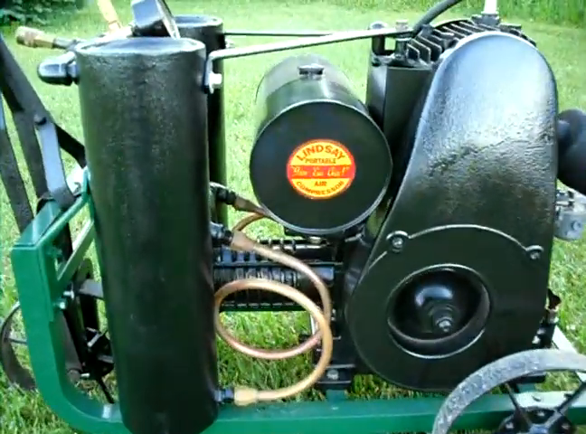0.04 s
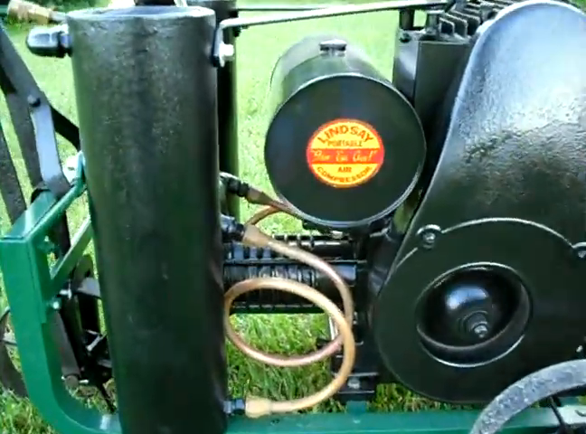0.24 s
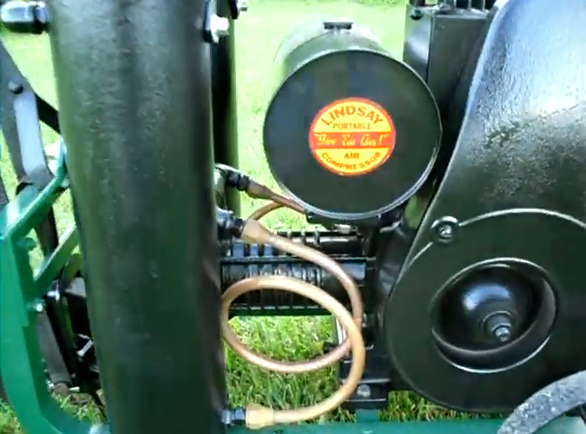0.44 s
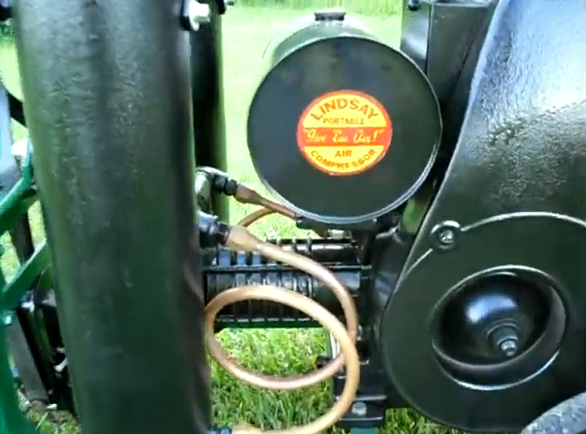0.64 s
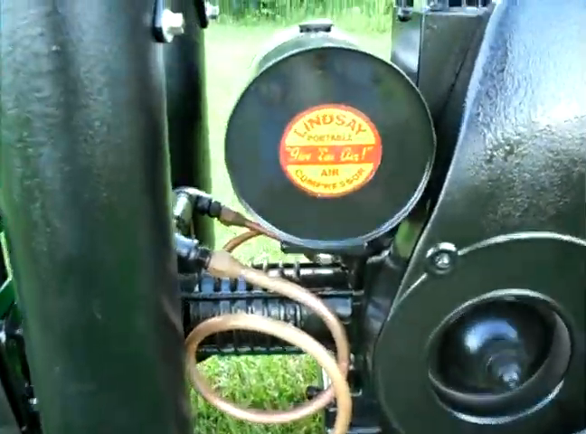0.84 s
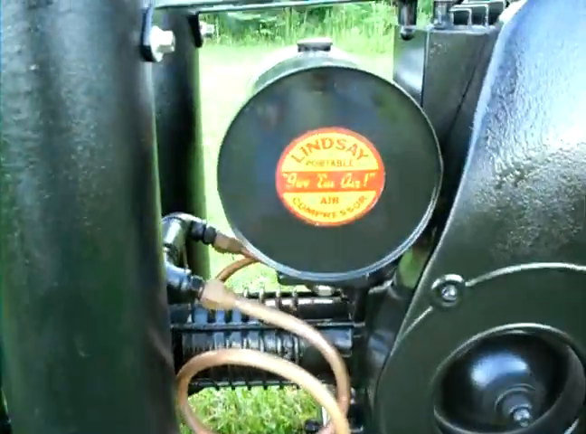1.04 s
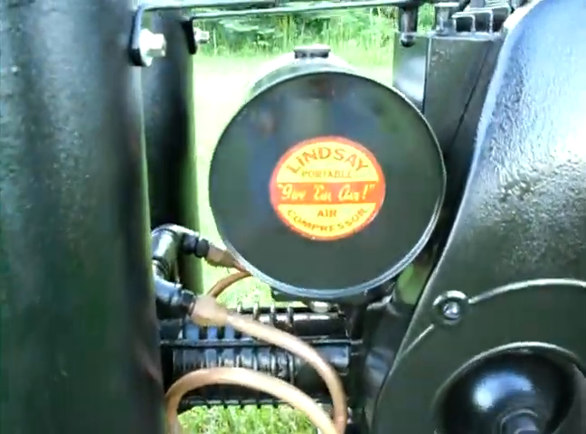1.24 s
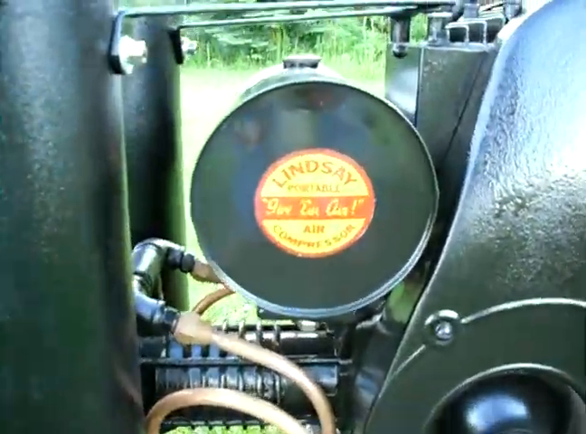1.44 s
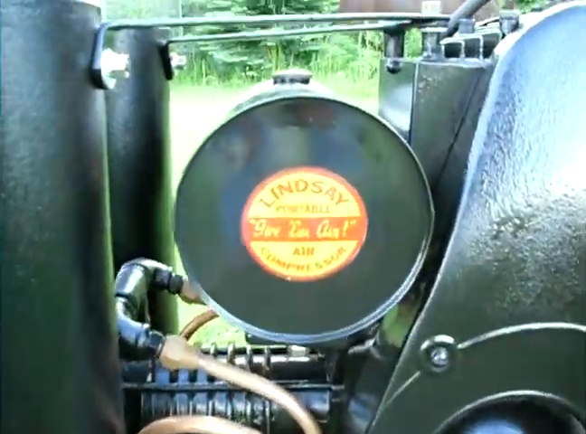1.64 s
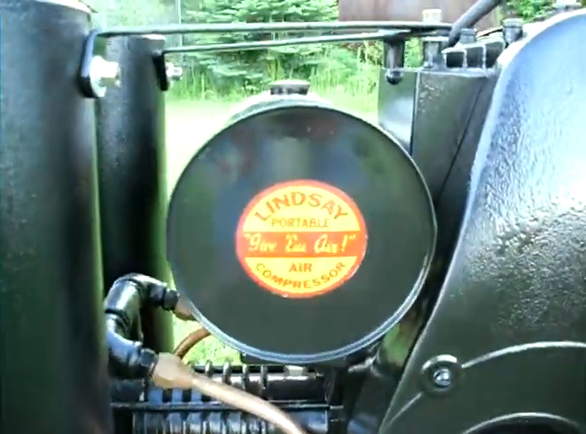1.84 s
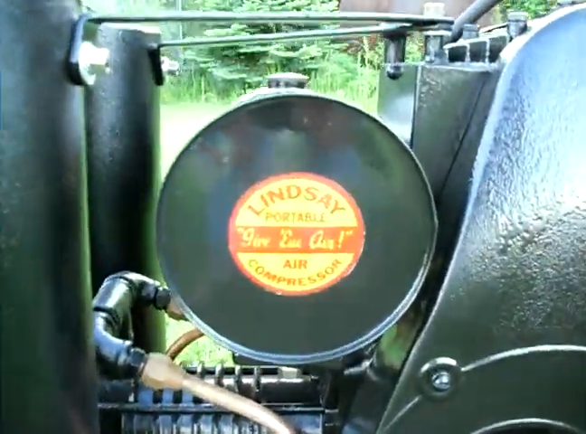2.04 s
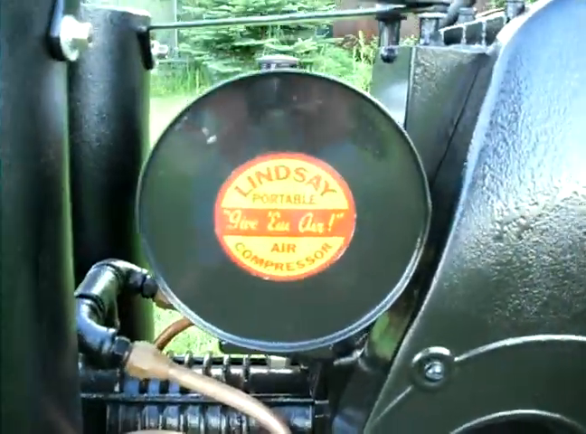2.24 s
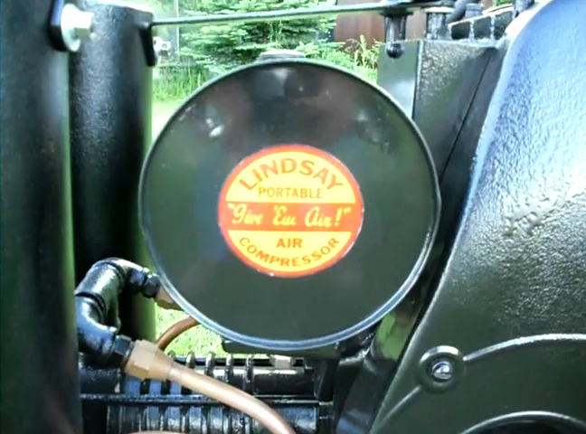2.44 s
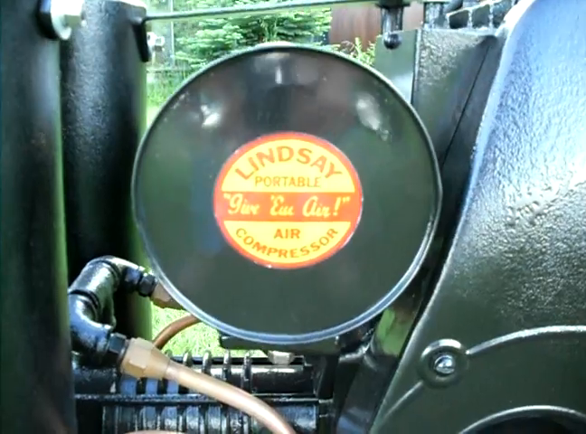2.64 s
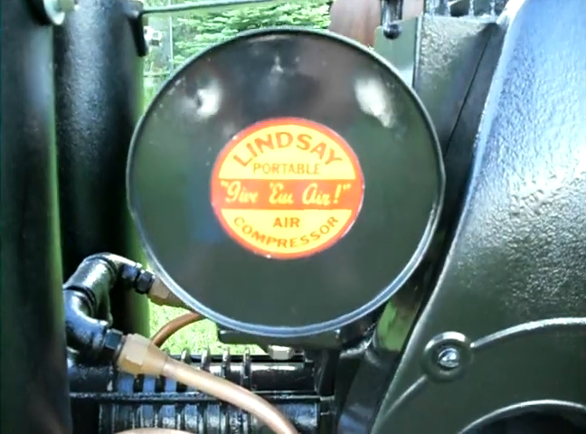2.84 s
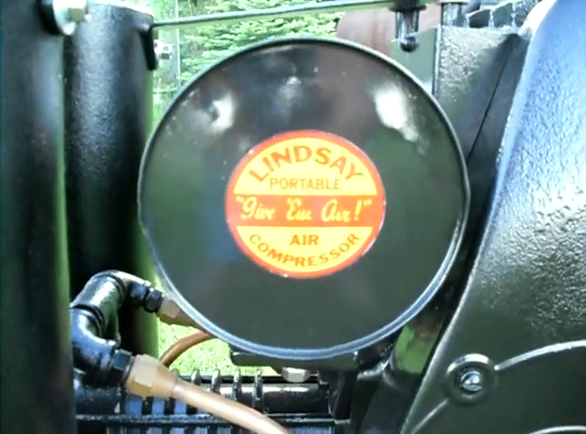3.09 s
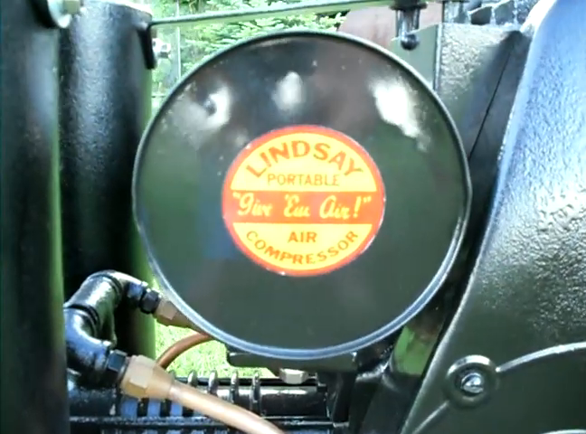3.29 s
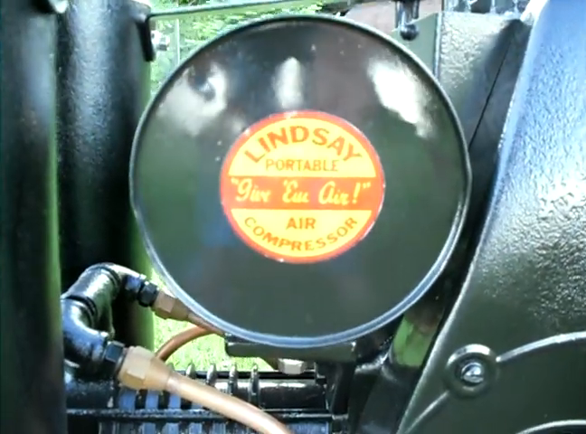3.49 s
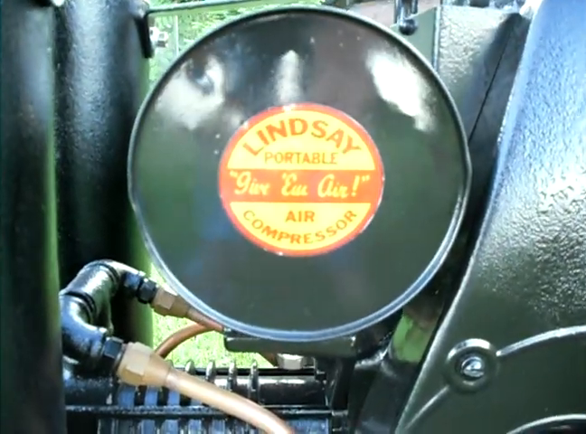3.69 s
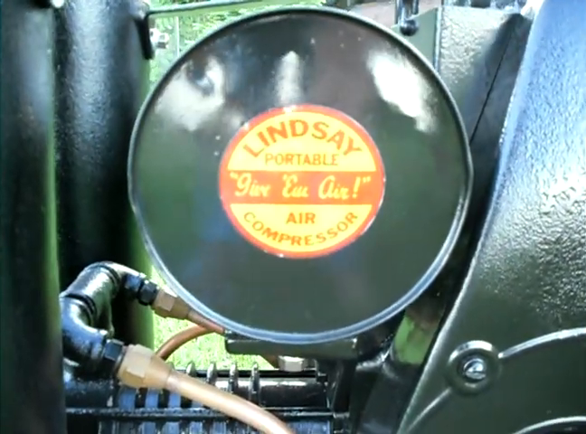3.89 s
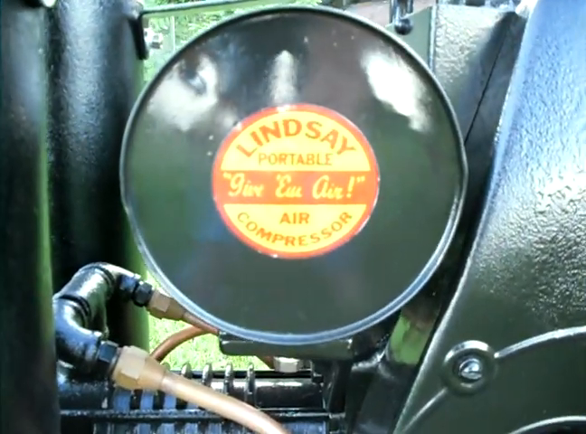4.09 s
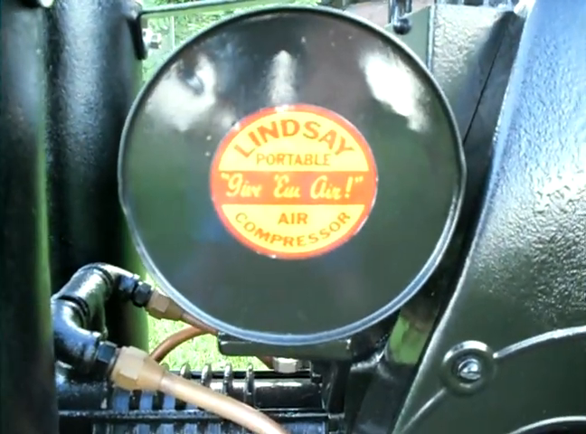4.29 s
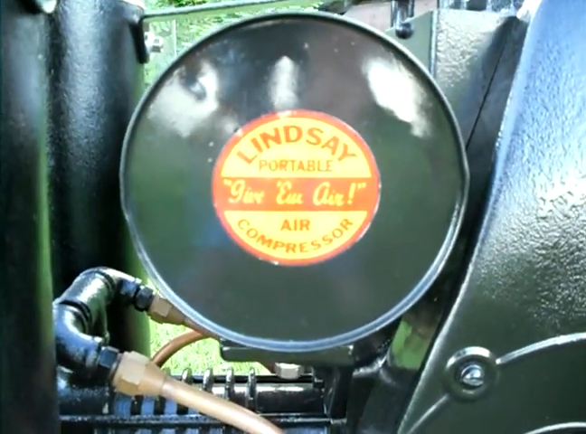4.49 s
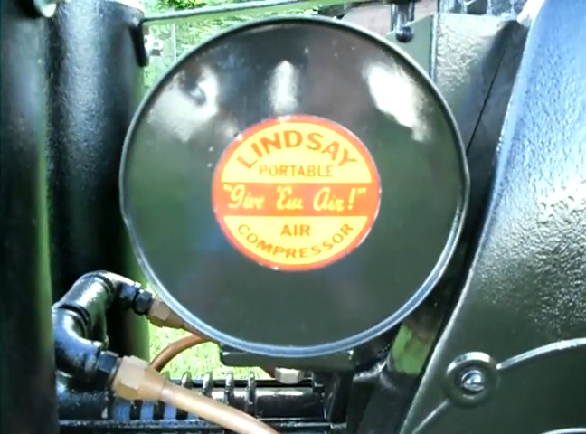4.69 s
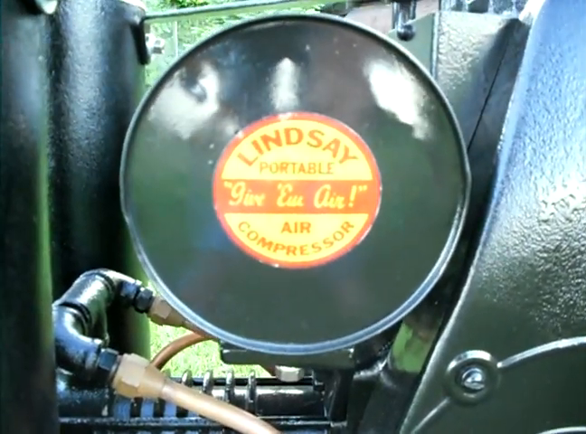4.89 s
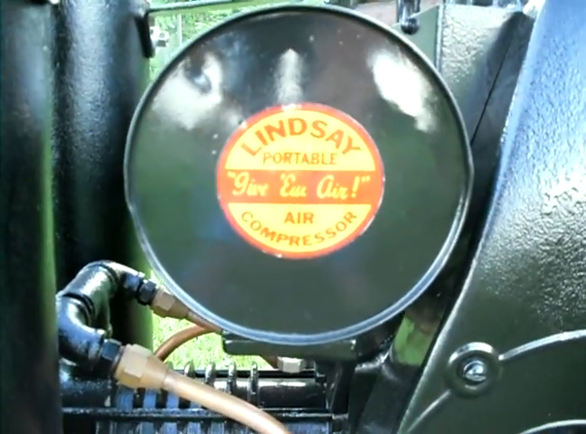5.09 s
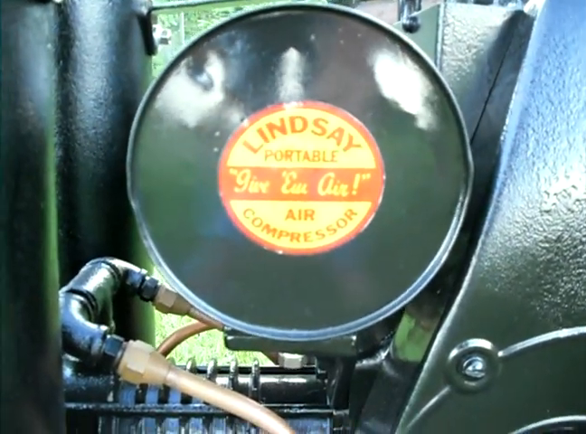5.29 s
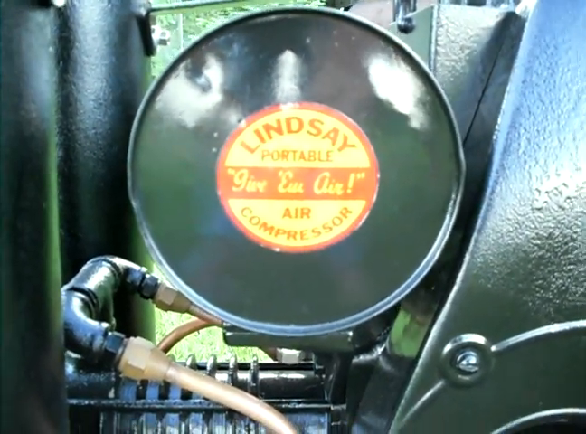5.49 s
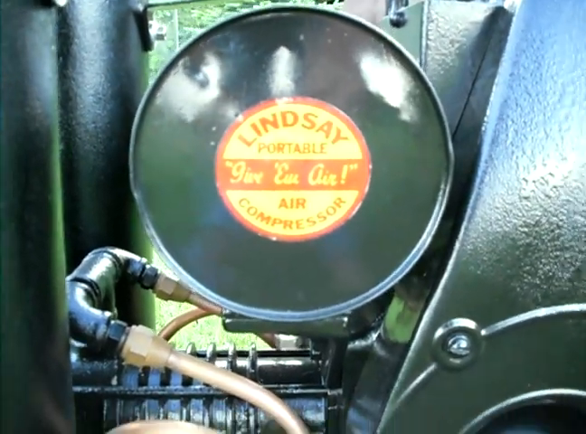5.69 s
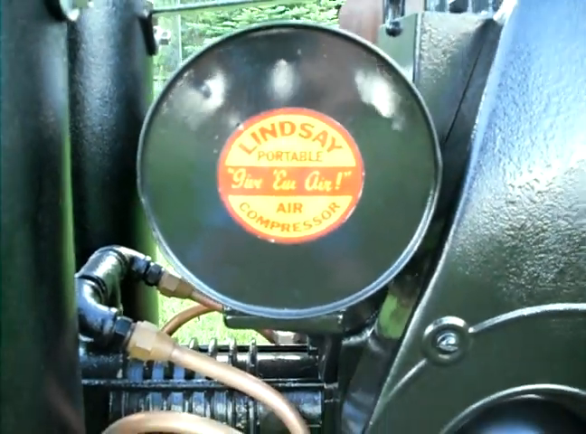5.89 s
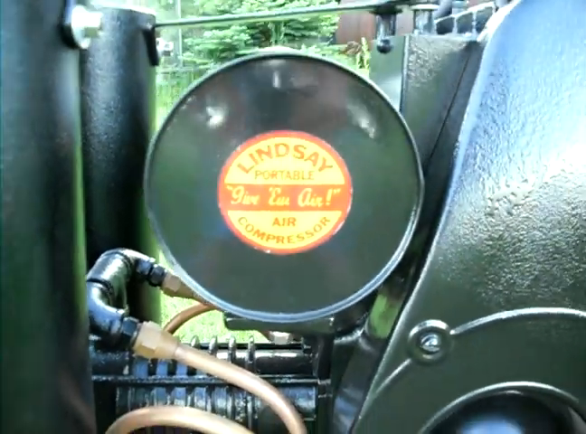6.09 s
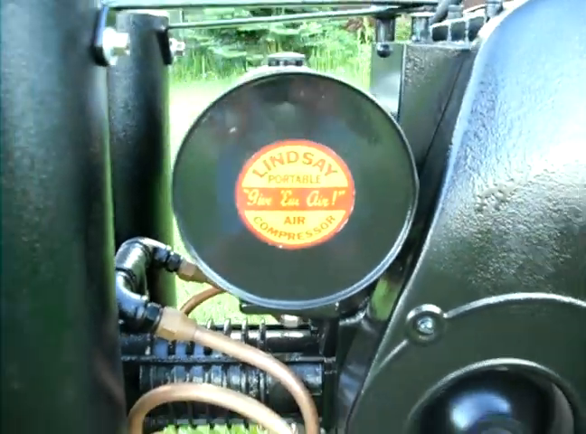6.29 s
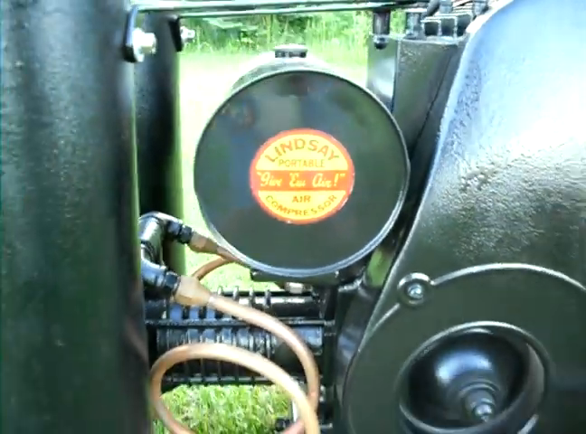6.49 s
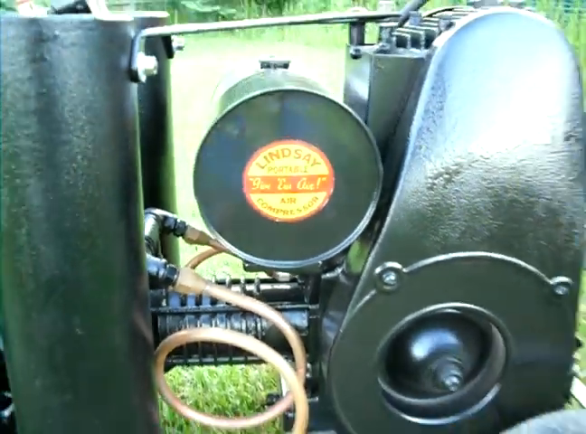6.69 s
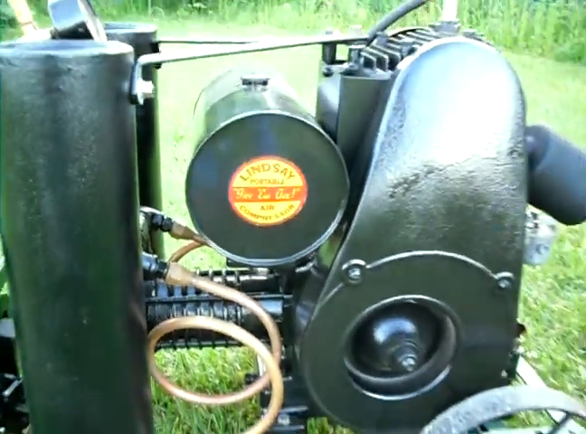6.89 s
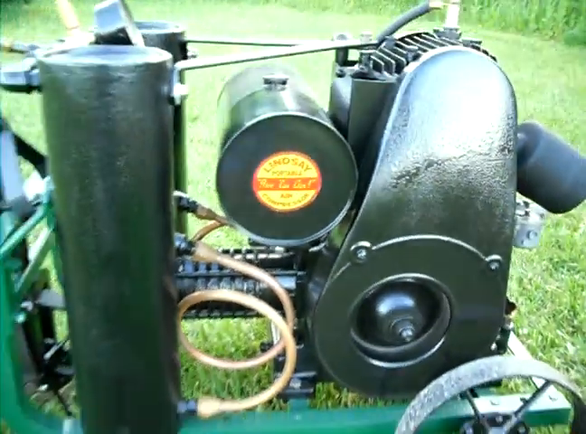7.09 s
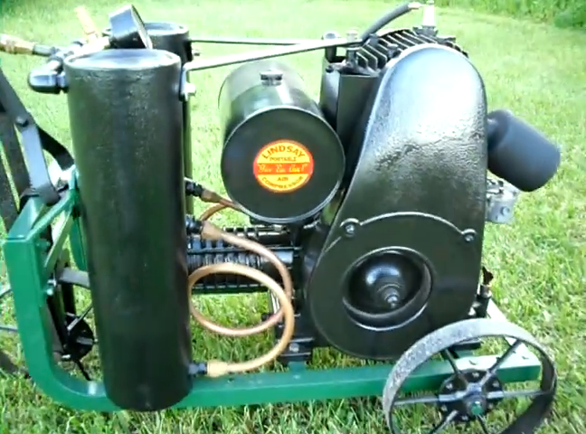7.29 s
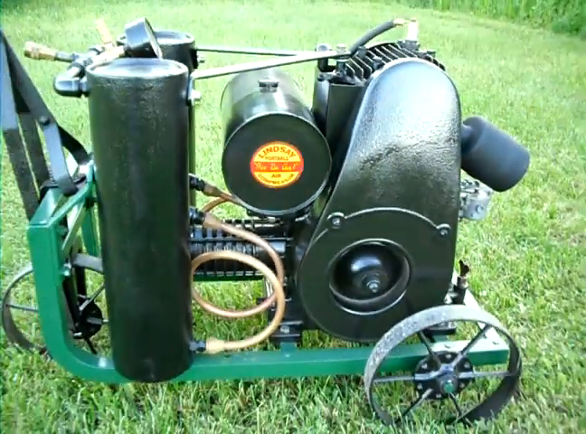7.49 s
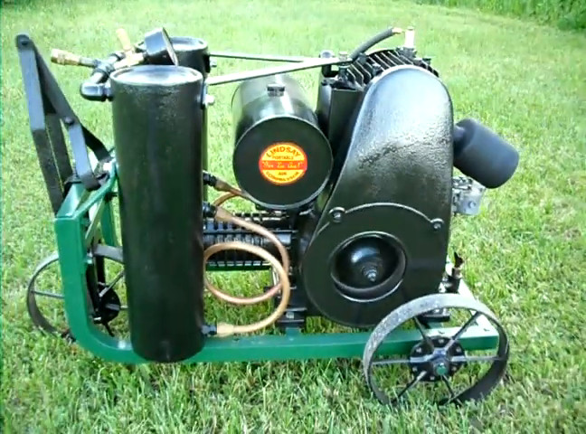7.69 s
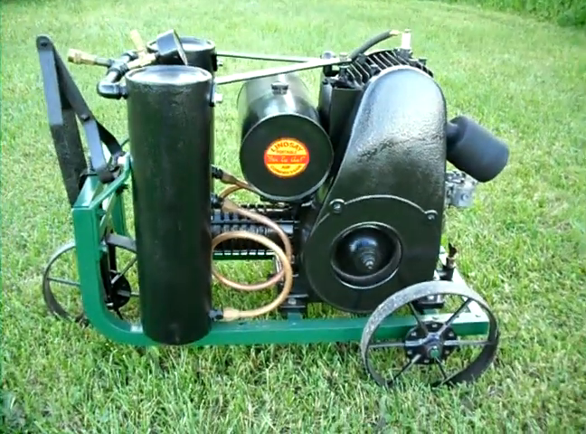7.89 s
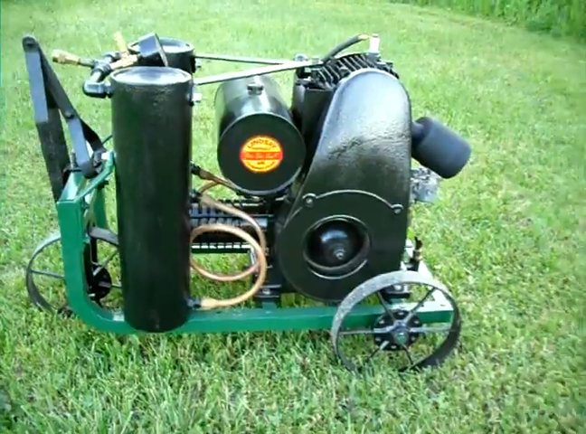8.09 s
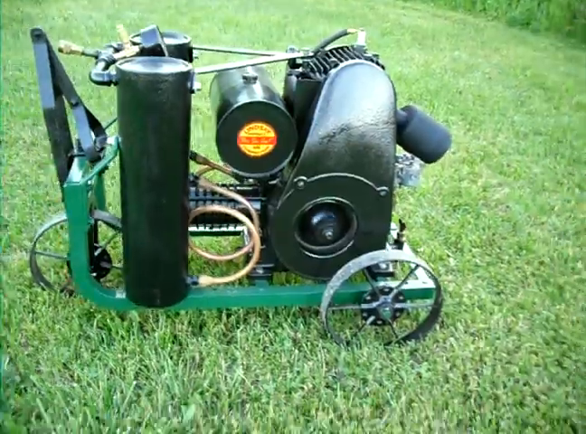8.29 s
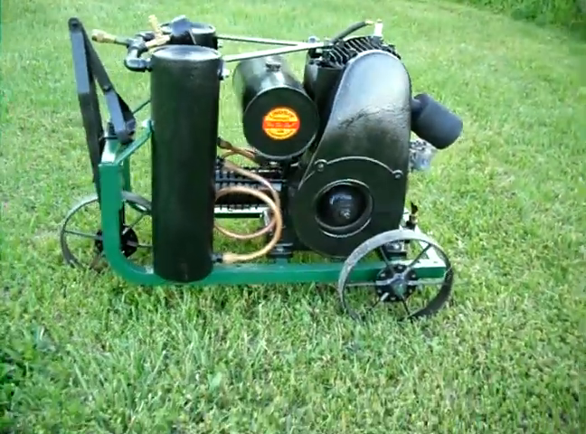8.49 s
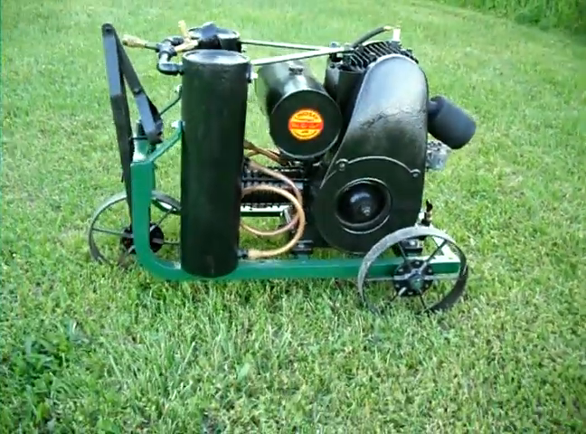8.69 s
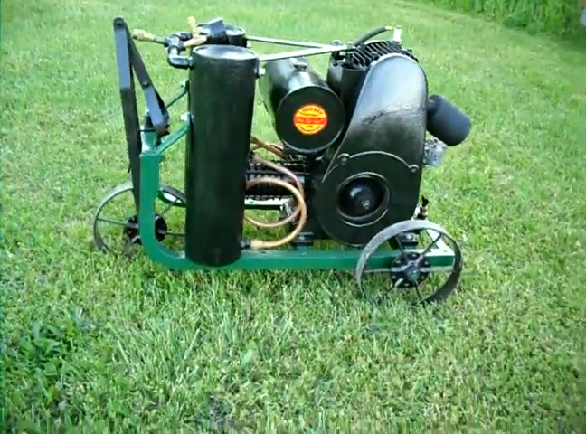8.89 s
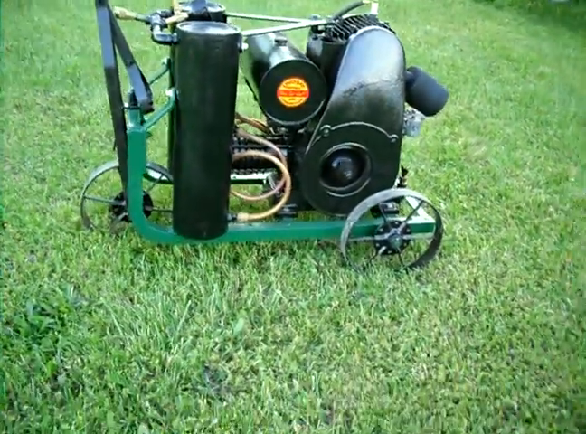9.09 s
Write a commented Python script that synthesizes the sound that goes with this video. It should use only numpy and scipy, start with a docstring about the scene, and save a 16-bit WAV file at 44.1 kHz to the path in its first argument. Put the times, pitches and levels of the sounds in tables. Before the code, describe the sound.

An old single-cylinder gasoline engine thumps and spits just under seven times a second on a lawn, compressor rasping between, growing louder then receding.

```python
"""Heavy thumps and sharp exhaust spits come just under seven a second, from an old single-cylinder gasoline engine.
It drives an air compressor on a lawn, which rasps on every turn of the crank, so twice a firing.
Bursts of gas and air are shaped noise; thumps are pressure pulses, and knocks ring the body and fuel tank.
The microphone moves up close to the tank, where it overloads, then backs away; gusts of wind buffet it."""
import sys
import numpy as np
from scipy import signal
from scipy.fft import rfft, irfft
from scipy.io import wavfile

SR = 44100
rng = np.random.default_rng(int(sys.argv[2]) if len(sys.argv) > 2 else 0)


def digitize_waveform(pressure):
    """Quantize a signal to 16-bit integers and store it at the path in sys.argv[1].

    Rows of a 2-D input are taken as channels; values are limited to [-1, 1].
    """
    field = np.atleast_2d(pressure).T
    bounded = np.clip(field, -1, 1)
    quanta = np.round(bounded * 32767).astype(np.int16)
    wavfile.write(sys.argv[1], SR, quanta)


N = 403074
TIME, HZ = np.arange(N) / SR, np.fft.rfftfreq(N, 1 / SR)


def amp(db):
    """Decibels to gain."""
    return 10 ** (np.asarray(db) / 20)


def unit(x):
    """Scales to an rms of one."""
    return x / np.sqrt(np.mean(x ** 2) + 1e-20)


def along(rows, at):
    """Reads a two-column table along straight lines."""
    return np.interp(at, *np.transpose(rows))


def colour(x, points, peaks=()):
    """Filters x by a broad spectrum, drawn over log frequency, with resonances on top."""
    hz, db = np.transpose(points)
    curve = np.interp(np.log(HZ + 1), np.log(hz), db)
    for centre, width, lift in peaks:
        curve = curve + lift / (1 + (2 * (HZ - centre) / width) ** 2)
    return irfft(rfft(x) * amp(curve), N)


def noise(points, peaks=()):
    """Coloured noise of unit size."""
    return unit(colour(rng.standard_normal(N), points, peaks))


def wander(hz):
    """Slow random drift of unit size, rolled off above hz."""
    white = rng.standard_normal(N)
    return unit(irfft(rfft(white) / (1 + (HZ / hz) ** 4), N))


def ring(hz, db, t60):
    """One mode of a struck part, dying by 60 dB in t60 seconds."""
    t = np.arange(SR // 2) / SR
    return amp(db - 60 * t / t60) * np.sin(2 * np.pi * hz * t)


def swirl(x, delay=0.001091, sway=0.0002095, db=-9):
    """A short reflection inside a passage; gas speed shifts it, so each stroke rings a little differently."""
    reflection_time = TIME - delay - sway * wander(9.83)
    return unit(x + amp(db) * np.interp(reflection_time, TIME, x))


def puff(t, attack, hold, fall_db_per_s):
    """Envelope of a burst of gas: it rises, holds and dies away."""
    rise = np.minimum(t / attack, 1)
    return rise * amp(-fall_db_per_s * np.maximum(t - attack - hold, 0))


# engine speed, hunting a little about its governed idle: (t/s, rate/firings per s)
SPEED = [(0.0, 6.913), (1.1, 6.762), (1.25, 6.939), (2.0, 6.67), (2.85, 6.817), (3.2, 6.524), (3.35, 6.832),
         (3.5, 6.619), (3.95, 6.994), (4.35, 6.742), (5.3, 6.799), (6.3, 6.621), (6.7, 6.816), (7.6, 6.666),
         (8.55, 6.676), (8.7, 6.743), (9.14, 6.489)]
FIRST_FIRING_S = .0688


def crank():
    """Share of the engine cycle (two crank turns) gone by, and seconds since the exhaust valve opened."""
    speed = along(SPEED, TIME)
    cycles = np.cumsum(speed) / SR
    cycle = (cycles - np.interp(FIRST_FIRING_S, TIME, cycles)) % 1
    return cycle, cycle / speed


def each_firing(sound, delay, spread_db):
    """Plays a sound at every firing, with random strength if spread_db is above zero."""
    cycle, _ = crank()
    at = np.flatnonzero(np.diff(cycle) < 0) + round(delay * SR)
    train = np.zeros(N)
    train[np.clip(at, 0, N - 1)] = amp(spread_db * rng.standard_normal(len(at)))
    return signal.oaconvolve(train, sound)[:N]


# gusts on the microphone, smooth swells over a light breeze: (peak t/s, half length to 1/e t/s, relative level/dB)
GUSTS = [(0.386, 0.1, -23), (0.68, 0.18, -15.5), (1.045, 0.27, -14), (1.442, 0.16, -18.5),
         (1.95, 0.18, -26), (2.5, 0.15, -19), (2.69, .09, -15), (2.946, 0.35, -25.5), (4.576, 0.076, -30),
         (5.063, 0.17, -24.5), (5.35, 0.085, -29), (8.117, 0.077, -27), (8.448, 0.068, -35)]
BREEZE_DB = -39
# dull rumble of calmer air: (f/Hz, relative level/dB)
WIND_COLOUR = [(15, -26), (32, -20), (55, -5), (90, 0), (170, -0.5), (300, -10.5), (500, -15), (900, -29),
               (5000, -74.5)]
# higher roar of strong gusts: (f/Hz, relative level/dB)
ROAR_COLOUR = [(30, -33), (90, -12.5), (190, -1.5), (290, -1), (480, -8), (750, -15), (1500, -36.5),
               (5000, -65)]


def wind(db=0, lumpy_db=2.0, gust_db=-20, roar_db=-1):
    """Lumpy buffeting: a dull rumble when calm, a higher roar in the gusts."""
    swells = [amp(peak_db) * np.exp(-((TIME - s) / half) ** 2) for s, half, peak_db in GUSTS]
    power = amp(BREEZE_DB) ** 2 + np.sum(np.square(swells), axis=0)
    level_db = 10 * np.log10(power)
    strength = 1 / (1 + amp(2 * (gust_db - level_db)))  # one half at gust_db
    rumble = np.sqrt(1 - strength / 2) * noise(WIND_COLOUR)
    roar = amp(roar_db) * np.sqrt(strength) * noise(ROAR_COLOUR)
    return amp(db + level_db + lumpy_db * wander(45)) * (rumble + roar)


def tappet(db=-23):
    """A tappet ticks between the compressor's strokes and rings briefly."""
    t = np.arange(SR // 20) / SR
    delay, t60 = .088, .06  # s
    strike = each_firing(amp(db - 60 * t / t60), delay, spread_db=4.5)
    metal = noise([(500, -9.5), (2500, 2.5), (4200, 13.5), (5600, -19.5)], [(3720, 330, 7)])
    return strike * metal


# broad colour of the clatter: (f/Hz, relative level/dB)
GEAR_COLOUR = [(60, 7), (180, 3), (330, -3), (550, 3), (800, -0.5), (1200, 2), (1900, -1), (2800, 0),
               (4000, -2), (5000, -4), (5600, -15)]
# resonances on the clatter: (f/Hz, width f/Hz, lift level/dB)
GEAR_PEAKS = [(477, 52, 6.5), (549, 30, 5.4), (1074, 55, 8), (1315, 70, 5.3), (4010, 110, 5.4)]
# share of the cycle at which the piston first turns round, and the clatter's swing about its mean
DEAD_CENTRE_SHARE, CLATTER_SWING_DB = 0.2115, 2.5


def gears(cycle, db=-22.0, rattle_db=1.0):
    """Uneven clatter of gears and tappets, loudest midway through each of the piston's four strokes."""
    swing = -np.cos(8 * np.pi * (cycle - DEAD_CENTRE_SHARE))
    level_db = db + CLATTER_SWING_DB * swing + rattle_db * wander(220)
    return amp(level_db) * noise(GEAR_COLOUR, GEAR_PEAKS)


# the compressor's two strokes in an engine cycle: (share of the cycle at full flow, relative level/dB)
STROKES = [(0.352, 0), (0.871, -1.5)]
# broad colour of the rasping air: (f/Hz, relative level/dB)
AIR_COLOUR = [(60, -22.5), (260, -7), (500, 0.5), (720, -13.5), (1100, 3), (1800, 0.5), (2800, -1),
              (4200, 4.5), (5000, -4.5), (5600, -9)]
# resonances of the air passages: (f/Hz, width f/Hz, lift level/dB)
AIR_PEAKS = [(530, 78, -6.5), (1436, 74, 4), (2340, 270, 5), (3850, 100, -7), (4216, 130, 2),
             (4938, 175, 9)]
# shares of the cycle in which the flow builds by 10 dB and is shut off by 10 dB; air leaks in between
BUILD_SHARE, SHUT_SHARE, LEAK_DB = 0.074, 0.054, -31.5


def compressor(cycle, db=-7.0, flutter_db=1.5):
    """Air rasps through a fluttering valve on each stroke: the flow builds slowly and is shut off fast."""
    flow = amp(LEAK_DB)
    for full, stroke_db in STROKES:
        late = (cycle - full + .5) % 1 - .5  # negative before full flow
        build = (late / BUILD_SHARE) ** 2
        shut = abs(late / SHUT_SHARE) ** 3
        drop = np.where(late < 0, build, shut)
        flow = np.hypot(flow, amp(stroke_db - 10 * drop))
    air = swirl(noise(AIR_COLOUR, AIR_PEAKS))
    return amp(db + flutter_db * wander(250)) * flow * air


# what the engine's body rings with when knocked: (f/Hz, relative level/dB, t60 t/s)
BODY = [(205, -26, .035), (425, -23.5, .05), (560, -26, .04), (615, -26.5, .045), (675, -21, .055),
        (750, -26.5, .035), (930, -28, .04), (1075, -28, .06), (1450, -28, .035)]
TANK_HZ, TANK_DB, TANK_T60 = 490, -28, .21  # Hz, relative dB, s


def knocks(near_db, db=-1, body_reach=0.097, tank_reach=1.1, waver_db=1.0):
    """Both ends of the slug knock the body; the tank's longer, wavering ring fades faster with distance."""
    first, second = -.0005, .0135  # s from the firing

    def blows(sound):
        """Two knocks a firing, each of uneven strength."""
        return each_firing(sound, first, spread_db=3.5) + each_firing(sound, second, spread_db=3)

    tank_gain = amp(tank_reach * near_db + waver_db * wander(25))
    tank = blows(ring(TANK_HZ, TANK_DB, TANK_T60)) * tank_gain
    body = blows(sum(ring(*mode) for mode in BODY))
    return amp(db + body_reach * near_db) * body + tank


# colour of the thump through the muffler: (f/Hz, relative level/dB)
THUMP_COLOUR = [(12, -37.5), (26, -7), (42, -3.5), (85, 1), (118, -3), (160, 1), (250, -1.5), (400, -16.5),
                (1500, 6)]


def thump(swell=.0112, shut=0.0041, swell_db=-13, shut_db=-5.5, crack_db=-7):
    """The valve cracks open; a slug of gas swells slowly and is cut off fast."""
    t = np.arange(SR // 20) / SR
    crack = .0011  # s
    # a slow ramp, then a short pulse of the opposite sign
    ramp = amp(swell_db) * t / swell * (t < swell)
    cutoff = amp(shut_db) * np.sin(np.pi * np.clip((t - swell) / shut, 0, 1))
    slug = cutoff - ramp
    pop = amp(crack_db) * np.sin(np.pi * np.clip(t / crack, 0, 1)) ** 2
    pulses = each_firing(slug, 0, spread_db=0.0) + each_firing(pop, -crack / 2, spread_db=0.5)
    return colour(pulses, THUMP_COLOUR)


# broad colour of the exhaust jet: (f/Hz, relative level/dB)
JET_COLOUR = [(100, 4), (500, 2), (1200, 1), (1800, 0), (2400, -0.5), (3400, 0), (4300, 5), (5300, 1.5),
              (5800, -0.5)]
# resonances of the exhaust passages: (f/Hz, width f/Hz, lift level/dB)
JET_PEAKS = [(2300, 650, 7.5), (2800, 380, 6.9), (4650, 260, 5.5), (4960, 360, 2.7), (5120, 160, 8.9),
             (5700, 49, 6)]
# jet of gas after the valve opens: the hiss peaks first, the rasp builds as the valve lifts (relative dB)
HISS_DB, HISS_ATTACK_S, HISS_HOLD_S, HISS_FALL_DB_PER_S = 3.5, 0.0041, 0.0031, 3205
RASP_DB, RASP_ATTACK_S, RASP_HOLD_S, RASP_FALL_DB_PER_S = 1.5, 0.0058, 0.0036, 2201
# the last of the gas trails out as the piston rises
TRAIL_DB, TRAIL_ATTACK_S, TRAIL_HOLD_S, TRAIL_FALL_DB_PER_S = -23.5, 0.0071, .017, 2496.5


def exhaust(since, db=-7, sputter_db=1.16, split_hz=3400):
    """A sharp, sputtering spit of hot gas through the muffler: hiss above split_hz, rasp below."""
    gas = swirl(noise(JET_COLOUR, JET_PEAKS))
    rasp = signal.sosfiltfilt(signal.butter(4, split_hz, fs=SR, output="sos"), gas)
    hiss = gas - rasp
    hiss_gain = amp(HISS_DB) * puff(since, HISS_ATTACK_S, HISS_HOLD_S, HISS_FALL_DB_PER_S)
    trail_gain = amp(TRAIL_DB) * puff(since, TRAIL_ATTACK_S, TRAIL_HOLD_S, TRAIL_FALL_DB_PER_S)
    rasp_gain = amp(RASP_DB) * puff(since, RASP_ATTACK_S, RASP_HOLD_S, RASP_FALL_DB_PER_S)
    jet = (hiss_gain + trail_gain) * hiss + rasp_gain * rasp
    return amp(db + sputter_db * wander(180)) * jet


# change of colour from close by the tank to far in front of the machine: (f/Hz, change of level/dB)
FAR_COLOUR = [(300, -5.5), (490, -8), (660, 4.5), (1100, -3.5), (1750, -2), (2300, 0.5), (2850, 4),
              (3500, -2), (4300, -4.5), (5200, -2.5)]


def surroundings(x, near_db, far_db=-8, echoes=((.0013, .0009, -17), (.0034, -.0011, -15), (.0062, .0016, -17))):
    """Colour and short echoes off tank, guard and ground shift with distance: (delay s, extra when far s, dB)."""
    far = np.clip(near_db / far_db, 0, 1)
    x = (1 - far) * x + far * colour(x, FAR_COLOUR)
    return x + sum(amp(db) * np.interp(TIME - delay - extra * far, TIME, x) for delay, extra, db in echoes)


# loudness as the microphone comes close and leaves: (t/s, relative level/dB)
NEARNESS = [(0, -2.5), (.5, -3), (1.5, -1), (4.5, .5), (5.8, -0.17), (6.8, -3.5), (8.3, -7.5), (9.14, -7.5)]
# the exhaust's low notes bend round the machine and follow only a share of that change
BOOM_DB, BOOM_SHARE = 1.35, 0.89


def scene():
    """Hiss and clatter follow the distance closely; the thump has its own, slower fall."""
    cycle, since = crank()
    near_db = along(NEARNESS, TIME)
    machine = gears(cycle) + tappet() + compressor(cycle) + exhaust(since)
    hiss = amp(near_db) * surroundings(machine, near_db)
    boom = amp(BOOM_DB + BOOM_SHARE * near_db) * (thump() + knocks(near_db))
    return (wind() + hiss + boom)[None]


BAND_HZ, EDGE_HZ = 5758, 16000  # low-pass before and after the second clipping


def record(dry, input_limit=0.83, output_limit=0.74):
    """A narrow-band microphone chain: the input overloads, and the overshoots of its filter clip again."""
    overloaded = dry / (1 + (dry / input_limit) ** 8) ** (1 / 8)
    band = signal.firwin(numtaps=2 ** 7 + 1, cutoff=BAND_HZ, window=("kaiser", 7), fs=SR)
    narrow = signal.oaconvolve(overloaded, band[None], "same")
    clipped = np.clip(narrow, -output_limit, output_limit)
    edge = signal.firwin(511, EDGE_HZ, window=("kaiser", 9), fs=SR)
    return signal.oaconvolve(clipped, edge[None], "same")


dry = scene()
out = record(dry)
digitize_waveform(out)
```